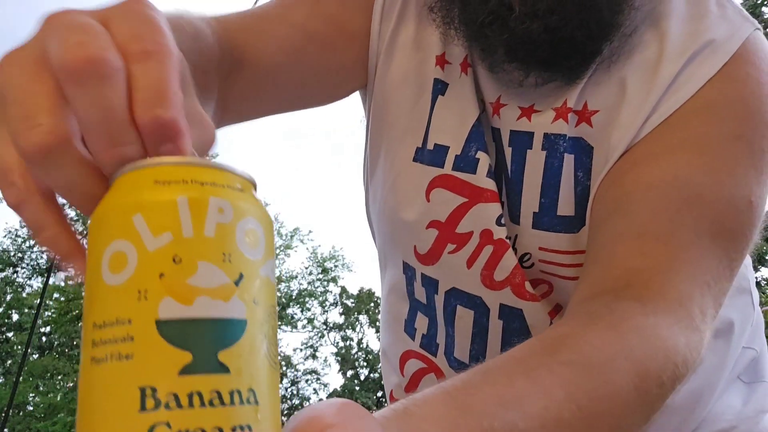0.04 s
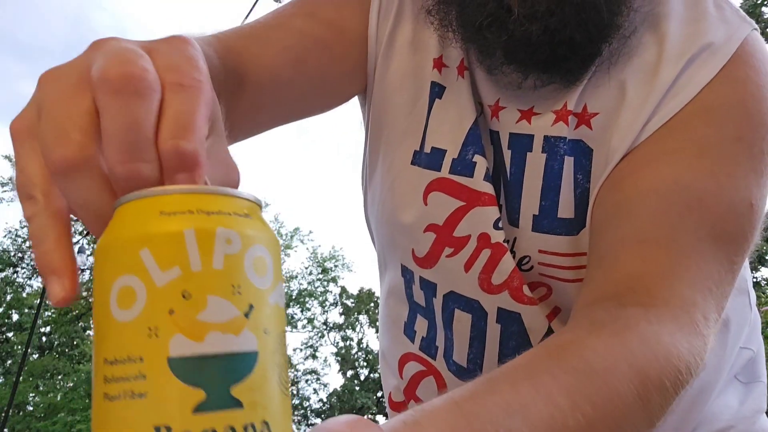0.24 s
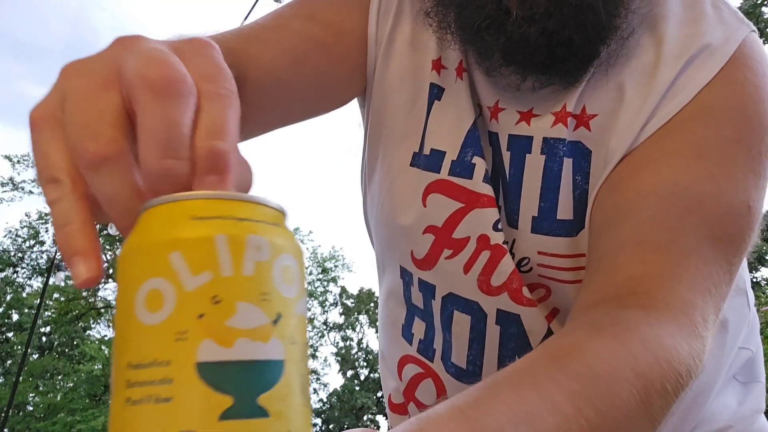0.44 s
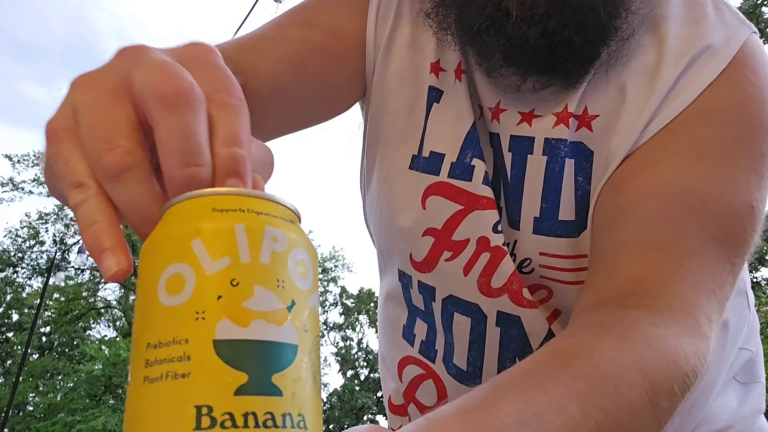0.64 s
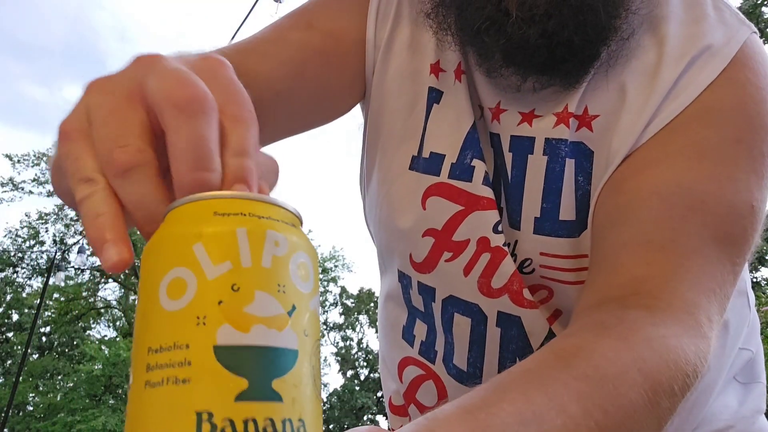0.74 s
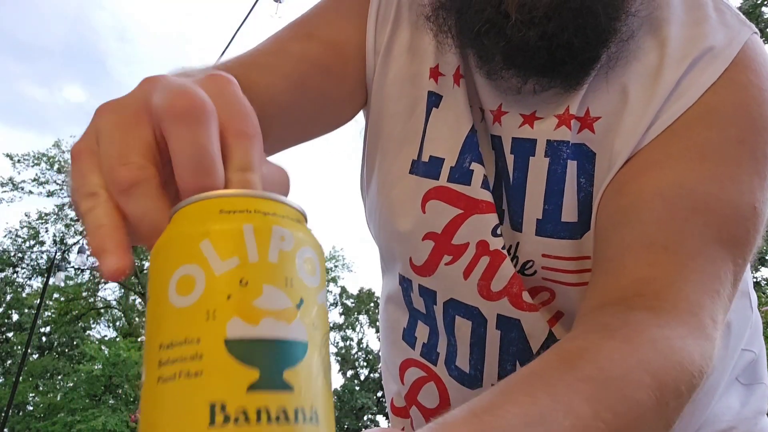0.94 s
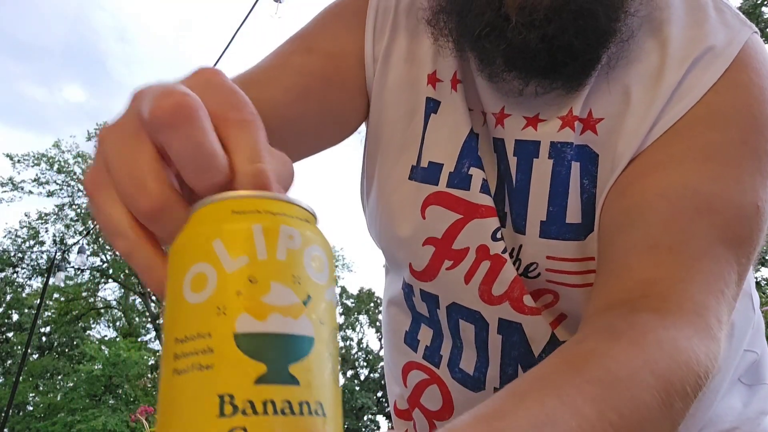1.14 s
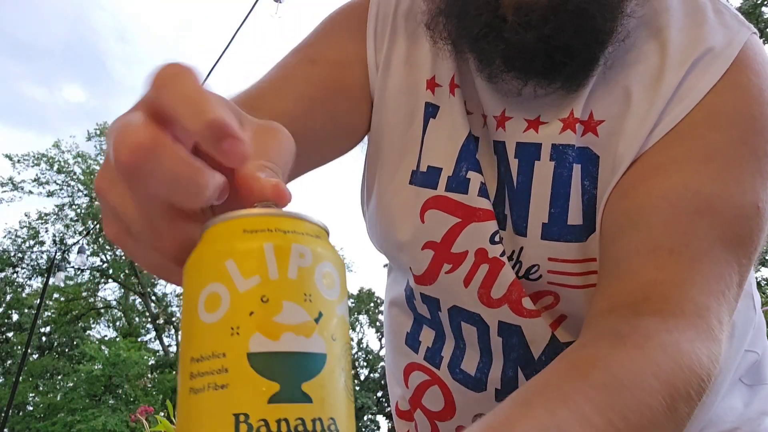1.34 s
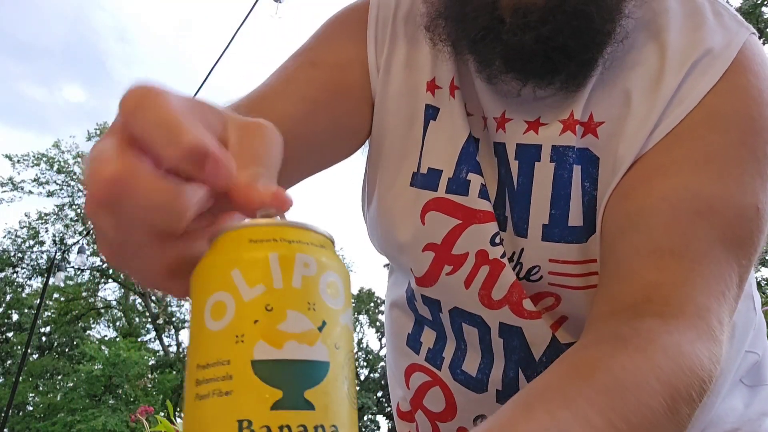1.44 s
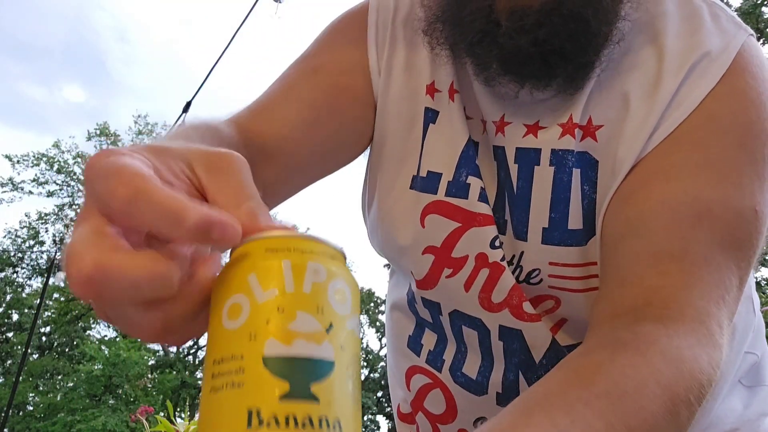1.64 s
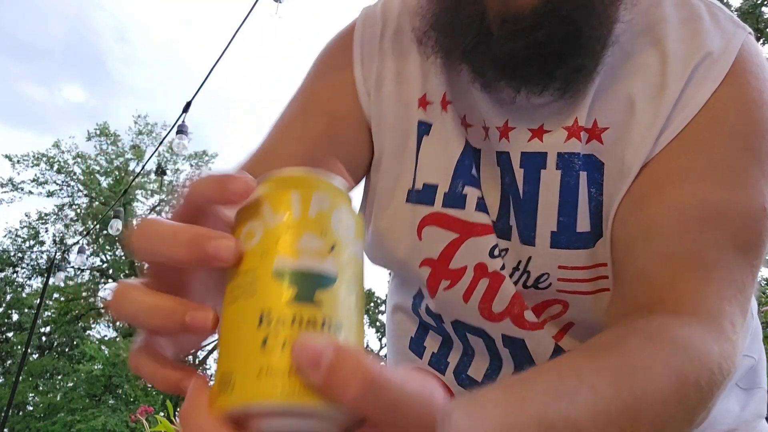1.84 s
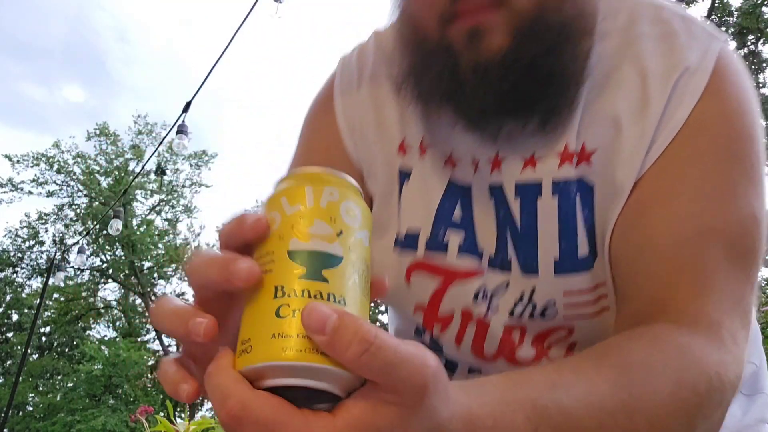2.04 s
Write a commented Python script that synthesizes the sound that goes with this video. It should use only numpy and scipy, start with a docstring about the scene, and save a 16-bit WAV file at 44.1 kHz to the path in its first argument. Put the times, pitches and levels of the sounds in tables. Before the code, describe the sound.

A drink can cracks open almost at once, very close to the microphone, with a loud metallic snap and short dying hiss; small tab ticks and hollow plinks follow over low outdoor rumble.

```python
"""Outdoors, over a steady low rumble, a drink can is cracked open close to the microphone.
The lid tears in bursts of noise with a low puff of gas; dying tones make it creak and ring, and hiss fades after.
The tab ticks (short noise bursts) and the can plinks (short tones) while it is handled.
A faint fizz of random clicks and hiss comes up as the can is lifted; narrow noise bands
make the singing under the fingers and a far-off insect."""
import sys
import numpy as np
from scipy import signal
from scipy.fft import rfft, irfft
from scipy.io import wavfile
from scipy.ndimage import uniform_filter1d

SR = 44100
rng = np.random.default_rng(int(sys.argv[2]) if len(sys.argv) > 2 else 0)


def bounce(signal):
    """Save signal as a 16-bit WAV file at the path given by the first command-line argument."""
    frames = np.transpose(np.atleast_2d(signal))
    limited = np.clip(frames, -1, 1)
    pcm = np.round(limited * 32767).astype(np.int16)
    wavfile.write(sys.argv[1], SR, pcm)


N = 92610  # length in samples: 2.1 s
T = np.arange(N) / SR  # time of each sample, s
HZ = np.fft.rfftfreq(N, 1 / SR)  # pitches of the full-length spectrum
AGE = np.arange(8192) / SR  # time since a short sound began, s
POP_S = .2272  # moment the lid gives way

# Stages of the lid tearing: start_s, level_db, rise_s, t60_s (time to fade by 60 dB), tilt_db_per_octave
TEAR_STAGES = [(.217, -35, .005, .04, -1.5), (.2241, -19, .0012, 0.0191, -4), (.2267, -6, .0008, .016, 0),
               (0.2299, -11, 0.00039, .029, 1)]
# Colour of the tearing metal and escaping gas: pitch_hz, relative level_db (per Hz)
TEAR_SPECTRUM = [(150, -40), (380, -19), (560, -4), (850, -5), (1020, -12), (1300, -7.5), (1900, -3.5),
                 (2700, -4), (3250, 7), (4200, -8), (5080, 4), (5900, -7), (7700, 4), (9000, -1.5),
                 (11700, 6), (13400, 3), (15000, 3), (16500, -5)]
# Tones of the creaking lid: pitch_hz, level_db, t60_s
CREAK_TONES = [(3330, -39.5, .02), (4970, -34.5, .025), (5150, -36.5, 0.02)]
# Colour of the low puff of released gas: pitch_hz, relative level_db (per Hz)
PUFF_SPECTRUM = [(200, -33.5), (400, -13), (520, -1), (660, -1), (740, -6), (820, 4), (950, -15),
                 (1500, -32)]
# Tones of the ringing lid and can: pitch_hz, level_db (added to RING_DB), t60_s, left_minus_right_db
LID_TONES = [(630, -18, .05, 0), (812, -5, .05, -1), (854.84, -18, 0.14, 2), (1432.4, -30, .11, -6.5),
             (2378, -10, 0.047, -7), (3123, 2.5, 0.049, -3.5), (3345, 2.5, .04, -6), (3432, -1, .05, -1.5),
             (3345, -17, .14, 2.5), (3777, -15, .09, -2), (5035, -8, .04, -12.5), (5071, -8, .04, -7),
             (6480, -10.5, .045, -0.5), (11490, -4, .05, -6.5), (11760, -5, .05, -2.5),
             (11500, -5, .05, -2.5), (13270, -6, 0.061, -2), (13440, -5, .05, -3.5), (14260, -7, .045, -2),
             (14720, -8, .045, -2)]
CREAK_S, CREAK_RISE_S = 0.24, .005
PUFF_DB, PUFF_RISE_S, PUFF_T60_S = -33, .001, .04
RING_DB, RING_RISE_S = -17.5, .0015
TEAR_PAN_DB = -2.2  # left minus right


def crack():
    """The scored lid tears in quick stages and creaks; gas puffs out and the can rings."""
    out = np.zeros((2, N))
    creak = sum(amp(db) * ring(hz, CREAK_RISE_S, t60) for hz, db, t60 in CREAK_TONES)
    add(out, CREAK_S, creak)
    for start, db, rise, t60, tilt in TEAR_STAGES:
        tear = burst(rise, t60) * hiss(TEAR_SPECTRUM, tilt)
        add(out, start, amp(db) * pan(TEAR_PAN_DB) * tear)
    puff = burst(PUFF_RISE_S, PUFF_T60_S) * hiss(PUFF_SPECTRUM)
    add(out, POP_S, amp(PUFF_DB) * puff)
    for hz, db, t60, side in LID_TONES:
        add(out, POP_S, amp(RING_DB + db) * pan(side) * ring(hz, RING_RISE_S, t60))
    return out


# Dying hiss and reflections after the pop: pitch_hz, relative level_db (per Hz), t60_s
TAIL_SPECTRUM = [(199.7, -24, .2), (550, -5, .2), (832.8, -0.5, .2), (1050, -8, 0.14), (2010, -9, .27),
                 (2750, 2, 0.18), (3300, 8.5, .2), (4100, -7.5, 0.28), (5300, -7.5, 0.27),
                 (6200, -10, 0.24), (8200, -4.5, .25), (10500, -1.5, 0.24), (12300, 5, .19),
                 (15600, -1, .19)]
TAIL_DB, TAIL_RISE_S = -28.5, .008
SPUTTER_DB, SPUTTER_S = 1.5, .004  # depth and rough length of a spurt of gas


def tail():
    """Sputtering hiss and reflections die away after the pop, each band at its own speed."""
    out = np.zeros((2, N))
    steady = hiss(TAIL_SPECTRUM, size=16384)
    hz, t, bands = signal.stft(steady, SR, nperseg=512, noverlap=384)
    t60 = read(TAIL_SPECTRUM, hz, axis=2)[:, None]
    bands = bands * amp(-60 * t / t60)
    dying = signal.istft(bands, SR, nperseg=512, noverlap=384)[1]
    age = T[:dying.shape[1]]
    level = TAIL_DB + SPUTTER_DB * wander(len(age), SPUTTER_S * SR)
    add(out, POP_S, amp(level) * np.minimum(age / TAIL_RISE_S, 1) * dying)
    return out


# Ticks of the tab: start_s, level_db, t60_s, tilt_db_per_octave, favoured pitch_hz
TAB_TICKS = [(0.083, -67, 0.051, 7.5, 12500), (0.4935, -43.5, 0.0372, 2.5, 7000),
             (0.5132, -53.5, 0.024, 1.5, 9000), (.7575, -65.5, .03, 0, 6000),
             (0.8439, -44, 0.0205, -1, 3200), (0.8527, -54, .035, 2, 9000), (.9755, -62, .04, -2.5, 4200),
             (.999, -59.5, .04, -4.5, 1700), (1.3312, -59.5, 0.0388, -1, 4400),
             (1.4085, -64, .04, -2, 1700), (1.5857, -48, .028, -.5, 2050), (1.591, -55, .035, 1.5, 7000),
             (1.8661, -56, 0.0294, 2, 3800), (1.894, -56, .045, 1, 6000)]
# Shared colour of the ticks: pitch_hz, relative level_db (per Hz)
TICK_SPECTRUM = [(300, -9.5), (950, -17), (1500, 3.5), (2100, 0.5), (2900, -1.5), (3600, 5), (4400, 0.5),
                 (5300, 0), (6800, 0), (8300, 4), (11000, -5.5), (14500, -1.5), (16500, -23)]
TICK_RISE_S, TICK_ECHO_DB, TICK_ECHO_T60_S = .0003, -20, 0.24
FOCUS_DB, FOCUS_OCTAVES = 5, .4  # height and width of the boost around the favoured pitch


def ticks():
    """The tab makes short metallic noise bursts, each boosted around its own pitch, with a faint tail."""
    out = np.zeros((2, N))
    bins = np.fft.rfftfreq(len(AGE), 1 / SR) + 1  # 1 Hz up, to avoid the logarithm of zero
    for start, db, t60, tilt, hz in TAB_TICKS:
        focus = FOCUS_DB * np.exp(-(np.log2(bins / hz) / FOCUS_OCTAVES) ** 2)
        echo = amp(TICK_ECHO_DB) * burst(TICK_RISE_S, TICK_ECHO_T60_S)
        shape = burst(TICK_RISE_S, t60) + echo
        add(out, start, amp(db) * shape * hiss(TICK_SPECTRUM, tilt, focus))
    return out


# Soft hollow plinks from the handled can: start_s, pitch_hz, level_db, t60_s
CAN_PLINKS = [(.4938, 1540, -51, 0.0305), (0.8437, 1350, -56.5, 0.033), (0.8974, 1070, -56, 0.019),
              (1.1686, 1230, -54, 0.0367), (1.169, 2300, -61, .025), (1.174, 1478, -55, 0.059),
              (1.586, 1850, -41, .007), (1.6126, 1498, -54, .04), (1.7097, 1421, -62, 0.067)]
PLINK_RISE_S = 0.000535


def plinks():
    """The can in the hand gives quickly damped notes."""
    out = np.zeros((2, N))
    for start, hz, db, t60 in CAN_PLINKS:
        add(out, start, amp(db) * ring(hz, PLINK_RISE_S, t60))
    return out


# Loudness of the fizz over time: time_s, level_db
FIZZ_LOUDNESS = [(0, -69), (.14, -71), (.21, -54), (.36, -62), (.5, -72.5), (1.0, -69), (1.4, -71.5),
                 (1.68, -69.5), (1.82, -64.5), (1.89, -57), (1.94, -62.5), (2.05, -57), (2.1, -57.5)]
# Colour of the fizz: pitch_hz, relative level_db (per Hz)
FIZZ_SPECTRUM = [(500, -8), (850, 13.5), (1100, -6), (1750, 2), (2000, -1), (2300, 5), (2950, -9),
                 (3500, 0.5), (4400, -6.5), (5400, 2), (6400, -4.5), (8300, -0.5), (10800, -6.5),
                 (12200, 2), (13400, 0), (14800, 1.5), (16000, 4)]
BUBBLES_PER_S, BUBBLE_SPREAD_DB = 2500, 4  # rate in each channel; average boost of a bubble
BUBBLE_SHARE = .5  # share of bubbles against fine hiss
FIZZ_FLUTTER_DB, FIZZ_FLUTTER_S = 1.44, 0.014


def fizz():
    """Tiny bubbles burst as random clicks of uneven strength within a fine, fluttering hiss."""
    pops = (rng.random((2, N)) < BUBBLES_PER_S / SR) * rng.choice([-1, 1], (2, N))
    pops = pops * amp(BUBBLE_SPREAD_DB * np.minimum(rng.exponential(1, (2, N)), 4))
    fine_hiss = rng.standard_normal((2, N))
    drive = BUBBLE_SHARE * unit(pops) + (1 - BUBBLE_SHARE) * fine_hiss
    flutter = FIZZ_FLUTTER_DB * wander(N, FIZZ_FLUTTER_S * SR)
    level = over_time(FIZZ_LOUDNESS) + flutter
    return amp(level) * colour(drive, read(FIZZ_SPECTRUM, HZ) + ripple(N))


# Resonances of the can singing under the fingers: pitch_hz, width_hz (to each side), relative level_db
RUB_RESONANCES = [(3465.7, 55, 0), (3940, 30, -4), (5928, 50, -8)]
# Loudness of that singing over time: time_s, level_db
RUB_LOUDNESS = [(0, -74), (.18, -69), (.3, -83.5), (.5, -95), (1.62, -93), (1.83, -72.5), (1.93, -74),
                (2.1, -74)]


def rub():
    """Sliding fingers keep a few narrow resonances of the can sounding, made from filtered noise."""
    gain = sum(amp(db) / (1 + ((HZ - hz) / width) ** 2) for hz, width, db in RUB_RESONANCES)
    singing = colour(rng.standard_normal((2, N)), 20 * np.log10(gain))
    return amp(over_time(RUB_LOUDNESS)) * singing


HOLLOW_HZ, HOLLOW_WIDTH_HZ, HOLLOW_DB = 854.7, 22.8, -61
HOLLOW_S, HOLLOW_SPREAD_S = 2.2, 0.0326  # peak time (past the end) and spread of the swell


def hollow():
    """A narrow low noise band whose swell lies past the end, so it stays inaudible here."""
    hum = colour(rng.standard_normal(N), resonance_db(HOLLOW_HZ, HOLLOW_WIDTH_HZ))
    swell = np.exp(-((T - HOLLOW_S) / HOLLOW_SPREAD_S) ** 2)
    return amp(HOLLOW_DB) * swell * hum


# Loudness of the insect over time: time_s, level_db
INSECT_LOUDNESS = [(0, -86), (.6, -85), (.95, -81), (1.3, -84), (1.5, -77), (1.7, -82), (2.1, -80)]
INSECT_HZ, INSECT_WIDTH_HZ = 5400, 170


def insect():
    """A thin, distant buzz, blurred by the trees into a narrow band of noise."""
    buzz = colour(rng.standard_normal((2, N)), resonance_db(INSECT_HZ, INSECT_WIDTH_HZ))
    return amp(over_time(INSECT_LOUDNESS)) * buzz


# Colour of the outdoor background: pitch_hz, relative level_db (per Hz)
AIR_SPECTRUM = [(15, -28.5), (25, -12.5), (35, -0.5), (46, -3.5), (68, 2), (102, -2), (155, -4.5),
                (210, -12.5), (310, -19.5), (430, -26.5), (600, -29.5), (800, -32), (1020, -44),
                (1250, -43), (1650, -40.5), (2050, -51), (2900, -60.5), (3600, -55), (5400, -55.5),
                (8000, -61.5), (16000, -65)]
# Likeness of the two channels: pitch_hz, likeness (1 same, 0 unrelated, -1 opposite; no unit)
AIR_LIKENESS = [(60, 0.977), (160, 0.988), (290, .77), (640, .45), (1300, -0.47), (3000, .1),
                (15000, 0.074)]
AIR_DB, AIR_PATCHY_DB = -40.5, 1


def air():
    """A distant low rumble, alike in both channels in the bass, with gentle patches in time and pitch."""
    noise = rng.standard_normal((2, N))
    hz, _, (left, other) = signal.stft(noise, SR, nperseg=2048, noverlap=1536)
    same = np.clip(read(AIR_LIKENESS, hz), -.995, .995)[:, None]
    right = same * left + np.sqrt(1 - same ** 2) * other
    patches = uniform_filter1d(rng.standard_normal(left.shape), size=8, axis=0)
    patches = unit(uniform_filter1d(patches, size=8, axis=1))
    bands = np.array([left, right]) * amp(AIR_PATCHY_DB * patches)
    rumble = signal.istft(bands, SR, nperseg=2048, noverlap=1536)[1][:, :N]
    return amp(AIR_DB) * colour(rumble, read(AIR_SPECTRUM, HZ))


def amp(db):
    """Turns decibels into gain."""
    return 10 ** (np.asarray(db) / 20)


def unit(x):
    """Scales to an rms (average strength) of 1."""
    return x / np.sqrt(np.mean(x ** 2) + 1e-20)


def read(points, hz, axis=1):
    """Reads one column of a spectrum table, joining its points on a log-pitch axis."""
    table = np.transpose(points)
    return np.interp(np.log(hz + 1), np.log(table[0] + 1), table[axis])


def over_time(points):
    """Joins the points of a loudness table with straight lines in dB."""
    return np.interp(T, *np.transpose(points))


def pan(db):
    """Left and right gains for a left-minus-right difference."""
    return amp(np.array([[db], [-db]]) / 2)


def colour(x, db):
    """Filters x by a gain for each pitch, then scales to rms 1."""
    return unit(irfft(rfft(x) * amp(db), x.shape[-1]))


def resonance_db(centre, width):
    """Gain in dB of one resonance, falling off on both sides of its centre."""
    return -20 * np.log10(1 + ((HZ - centre) / width) ** 2)


def wander(length, span):
    """Smooth random curve of rms 1 that changes over about span points."""
    bell = np.exp(-(2 * np.fft.rfftfreq(length) * span) ** 2)
    return unit(irfft(rfft(rng.standard_normal(length)) * bell, length))


RIPPLE_DB, RIPPLE_WIDTH_HZ = 3.5, 70  # depth and rough width of random unevenness over pitch


def ripple(length):
    """Random unevenness over pitch in dB, drawn anew for each sound and channel."""
    span = RIPPLE_WIDTH_HZ * length / SR
    return RIPPLE_DB * np.array([wander(length, span)[:length // 2 + 1] for _ in range(2)])


ALIKE_HZ = 1280  # well below this, both channels hear alike


def hiss(points, tilt_db=0, extra_db=0, size=len(AGE)):
    """Stereo noise of a given colour, alike in both channels in the bass, apart and uneven in the treble."""
    hz = np.fft.rfftfreq(size, 1 / SR)
    mid, side = rfft(rng.standard_normal((2, size)))
    apart = np.sqrt(.5 / (1 + (ALIKE_HZ / (hz + 1)) ** 4))
    both = mid * np.sqrt(1 - apart ** 2) + np.array([[1], [-1]]) * side * apart
    slope = tilt_db * np.log2(np.maximum(hz, SR / 50))  # the tilt acts above 882 Hz
    uneven = np.sqrt(2) * apart * ripple(size)
    return unit(irfft(both * amp(read(points, hz) + slope + extra_db + uneven), size))


def burst(rise, t60):
    """Loudness shape with a straight rise and an exponential fall."""
    return np.minimum(AGE / rise, 1) * amp(-60 * np.maximum(AGE - rise, 0) / t60)


def ring(hz, rise, t60):
    """One dying tone; the higher it is, the more its phase may differ between the channels."""
    spread = min((hz / 4500) ** 2, .5)
    phase = rng.random() + rng.uniform(-1, 1, (2, 1)) * spread  # in cycles
    return burst(rise, t60) * np.sin(2 * np.pi * (hz * AGE + phase))


def add(mix, start, sound):
    """Lays a sound into the mix at a time in seconds, cut off at the end of the mix."""
    part = mix[:, round(start * SR):][:, :sound.shape[-1]]
    part += sound[..., :part.shape[1]]


HANDLING_PAN_DB = -1.66  # left minus right, for the tail and the handling sounds


def scene():
    """The can in front of the outdoor background."""
    backdrop = air()
    opening = crack() + hollow()
    handling = tail() + ticks() + plinks() + fizz() + rub()
    return backdrop + opening + pan(HANDLING_PAN_DB) * handling + insect()


# Dip in the microphone's response: pitch_hz, gain_db
MIC_RESPONSE = [(8700, 0), (9300, -7), (9800, -15.5), (10500, -5), (11400, -0.5)]
EDGE_HZ = 16050  # upper band limit


def record(dry):
    """The microphone colours the sound, which clips at full scale and then loses its highest treble."""
    heard = irfft(rfft(dry) * amp(read(MIC_RESPONSE, HZ)), N)
    clipped = np.clip(heard, -1, 1)
    lowpass = signal.firwin(255, EDGE_HZ, window=("kaiser", 9), fs=SR)
    return signal.oaconvolve(clipped, lowpass[None], "same")


dry = scene()
out = record(dry)
bounce(out)
```